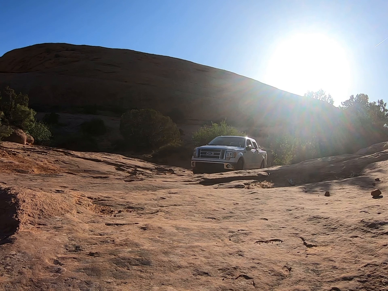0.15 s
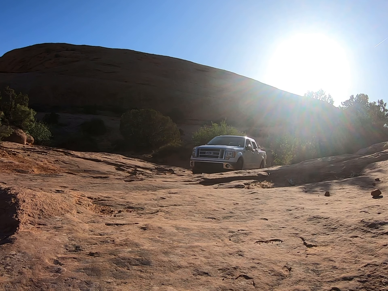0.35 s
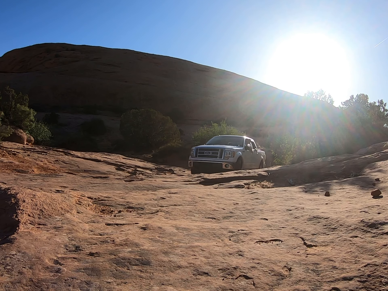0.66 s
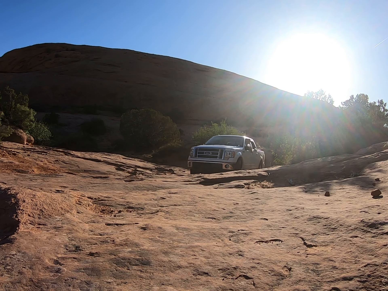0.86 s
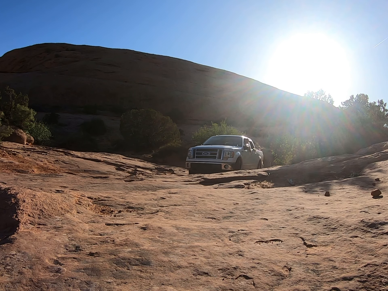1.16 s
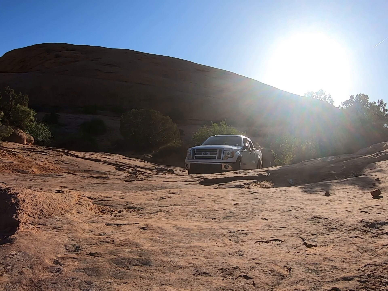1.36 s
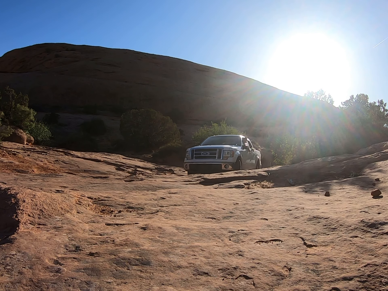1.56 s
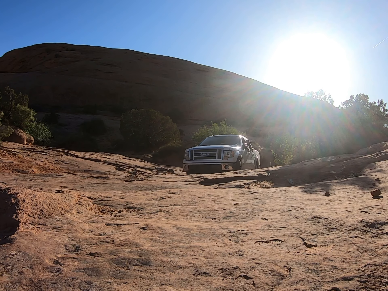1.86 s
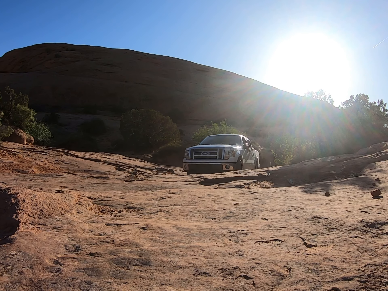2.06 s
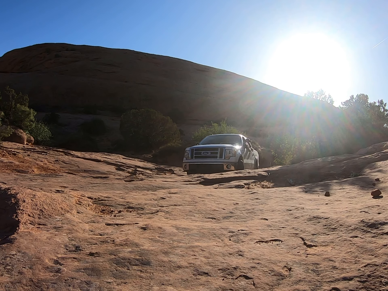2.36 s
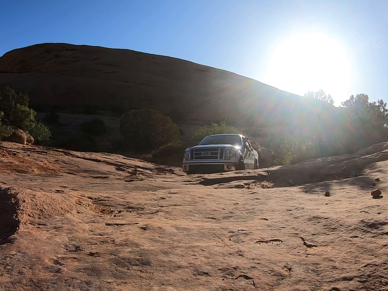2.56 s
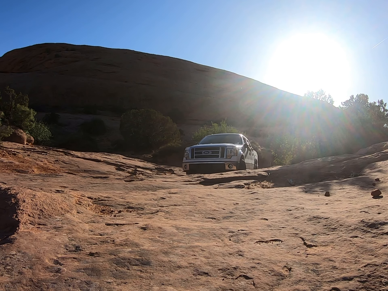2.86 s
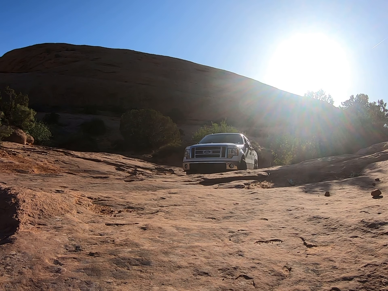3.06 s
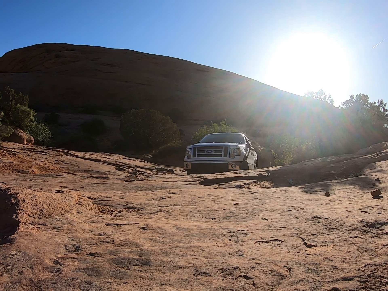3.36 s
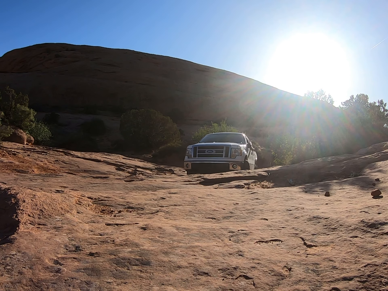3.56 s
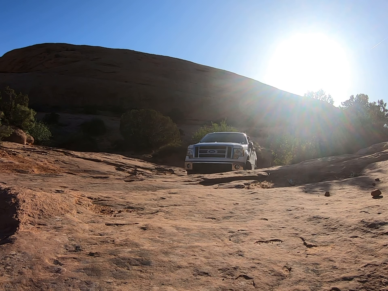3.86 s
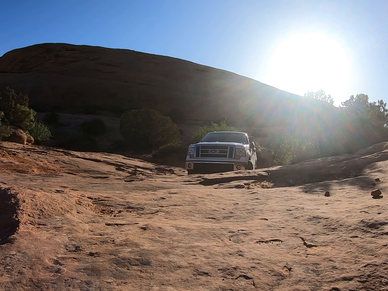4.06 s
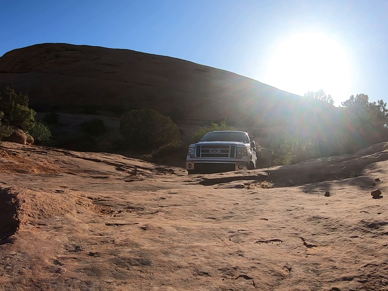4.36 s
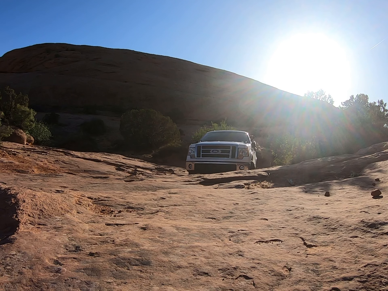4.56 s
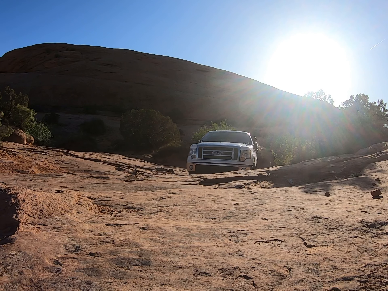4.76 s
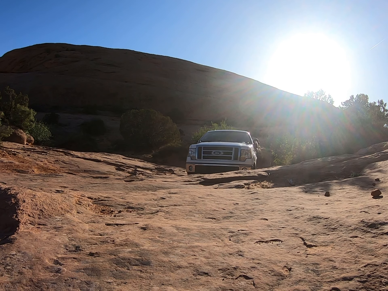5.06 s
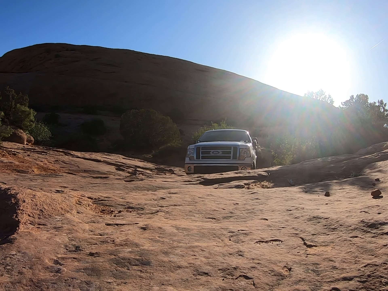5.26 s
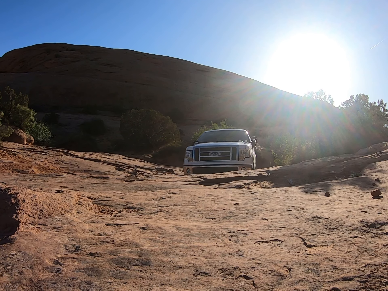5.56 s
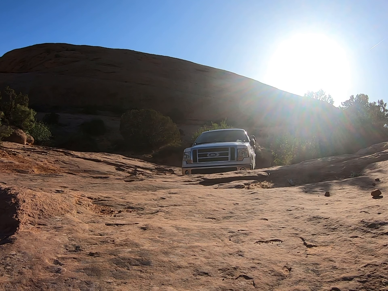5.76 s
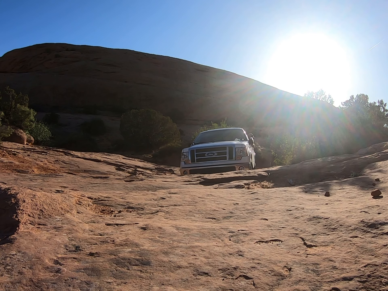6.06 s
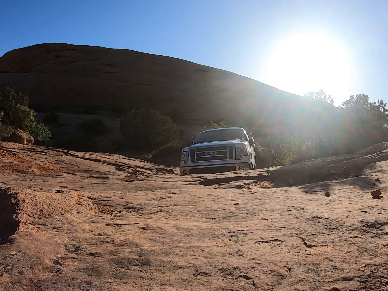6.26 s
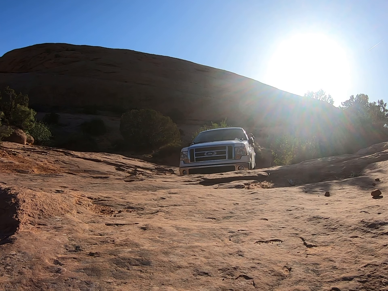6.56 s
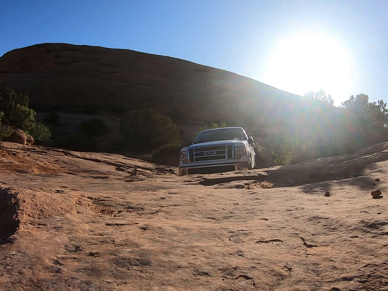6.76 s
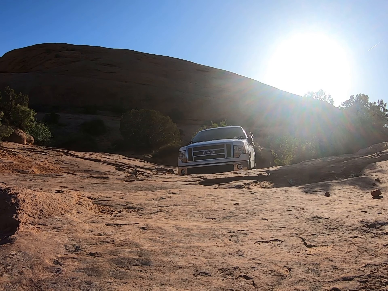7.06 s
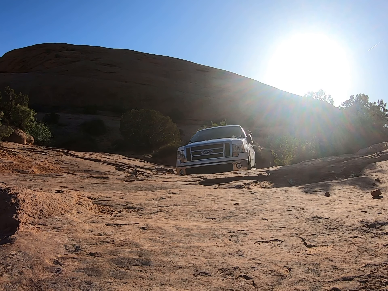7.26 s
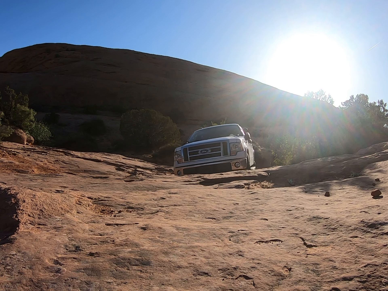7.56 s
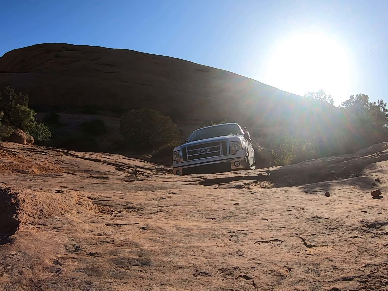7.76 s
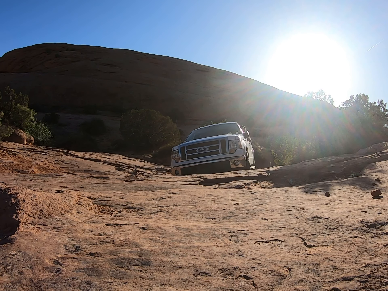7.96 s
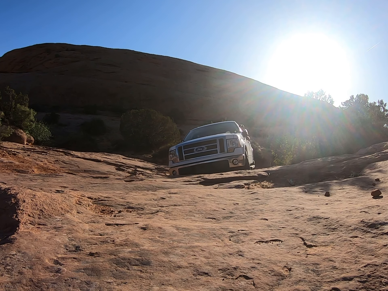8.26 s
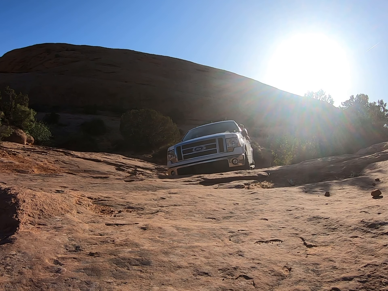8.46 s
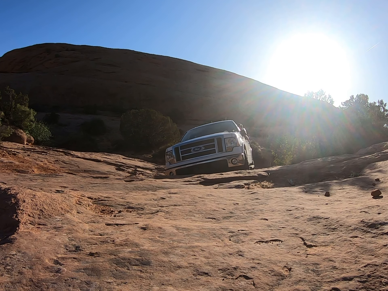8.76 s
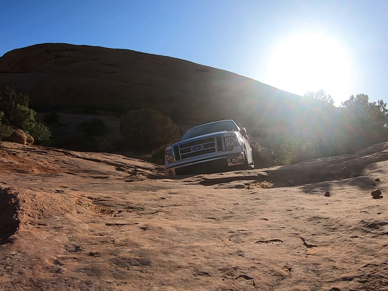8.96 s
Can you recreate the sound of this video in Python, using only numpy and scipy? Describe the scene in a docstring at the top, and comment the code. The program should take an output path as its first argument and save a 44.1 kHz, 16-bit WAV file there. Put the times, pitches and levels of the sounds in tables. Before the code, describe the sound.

A large V8 pickup crawls slowly toward a fixed outdoor microphone over bare rock. Its deep, uneven exhaust burble sits near idle, fades briefly around two seconds, then returns stronger, while a steady breathy fan rush gradually grows. A sharp stone knock snaps near five seconds, revs climb around seven, then drop, and a crunchy rattling knock comes near the end.

```python
"""A big V8 engine throbs unevenly near idle, under a breathy rush of fan and belts, as a pickup crawls closer.
The exhaust is one click per firing, sent through fixed resonances: both banks together throb and boom,
and the difference between the banks burbles. Engine speed and load rise and sag over bare rock.
Fan and belts are coloured noise and hum tones. Stones knock with short rings and rattles under the tyres,
and grit crunches in bursts of noise."""
import sys
import numpy as np
from scipy import signal
from scipy.fft import rfft, irfft, next_fast_len
from scipy.io import wavfile
from scipy.ndimage import map_coordinates

SR = 44100
rng = np.random.default_rng(int(sys.argv[2]) if len(sys.argv) > 2 else 0)


def wrap_up_sound(samples):
    """Save the sound to the file named by the first command line argument, as 16-bit audio."""
    columns = np.atleast_2d(samples).T
    # keep every value between -1 and 1, then stretch to whole-number steps
    tamed = np.clip(columns, -1, 1)
    steps = np.round(tamed * 32767).astype(np.int16)
    wavfile.write(sys.argv[1], SR, steps)


N = 402633  # length in samples


def amp(db):
    """Turn decibels into a gain."""
    return 10 ** (np.asarray(db) / 20)


def unit(x):
    """Scale to an rms of 1."""
    return x / np.sqrt(np.mean(x ** 2) + 1e-20)


def along(points, hz):
    """Read (Hz, value) points at any frequency, with straight lines on a log axis."""
    point_hz, value = np.transpose(points)
    return np.interp(np.log(hz + 1), np.log(point_hz + 1), value)


def curves(rows):
    """Draw one value per sample for each column after the time."""
    start_s, *columns = np.transpose(rows)
    time = np.arange(N) / SR
    return [np.interp(time, start_s, column) for column in columns]


def wobble(rate):
    """A smooth random curve through `rate` random points a second."""
    points = rng.standard_normal(int(N * rate / SR) + 4)
    return map_coordinates(points, [np.arange(N) * rate / SR])


def filtered(x, response):
    """Multiply the spectrum of x by a response that depends on frequency."""
    length = x.shape[-1]
    padded = next_fast_len(length + SR // 2)
    hz = np.fft.rfftfreq(padded, 1 / SR)
    return irfft(rfft(x, padded) * response(hz), padded)[..., :length]


def resonate(x, modes):
    """Ring x through resonances side by side; polarity says whether each one adds or subtracts."""
    def response(f):
        total = 0
        for centre, width, db, polarity in modes:
            peak = 1j * f * width / (centre * centre - f * f + 1j * f * width)
            total = total + np.sign(polarity) * amp(db) * peak
        return total
    return filtered(x, response)


def band(x, low_hz, high_hz):
    """Keep a band of pitches with steep sides."""
    sos = signal.butter(4, [low_hz, high_hz], "band", fs=SR, output="sos")
    return signal.sosfilt(sos, x)


def burst(t, t60, colour, attack=0.00018):
    """Coloured noise that rises over `attack` seconds and falls by 60 dB in t60 seconds."""
    noise = unit(filtered(rng.standard_normal(len(t)), colour))
    return noise * amp(-60 * t / t60) * (1 - np.exp(-t / attack)) / 2


# How alike left and right are: pitch_hz, likeness (1 = the same, 0 = unrelated, below 0 = opposed)
LIKENESS = [(100, 1), (300, 1), (600, 0.98), (1200, .97), (2500, 1), (4000, 0.99), (5500, 0.98),
            (7000, 0.57), (9000, -.25), (11000, .6)]


def air(spectrum):
    """Coloured stereo noise, nearly the same in both ears below the treble; its middle has an rms of 1."""
    def response(hz):
        turn = np.arccos(np.clip(along(LIKENESS, hz), -1, 1)) / 2
        side_gain = np.minimum(np.tan(turn), 2)
        return amp(along(spectrum, hz)) * np.array([np.ones_like(hz), side_gain])
    mid, side = filtered(rng.standard_normal((2, N)), response)
    return np.array([mid + side, mid - side]) / np.std(mid)


# Colour of the fan rush, far away and then near: pitch_hz, level_db (per Hz)
FAR_RUSH = [(170, -9), (290, -2.5), (317, -1.5), (355, -8.5), (384, -5), (440, -5.5), (536, -8.5),
            (580, -7.5), (734, -6.5), (849, -14.5), (1280, -13), (1400, -16.5), (2840, -17.5), (4200, -28),
            (5460, -40), (9240, -120)]
NEAR_RUSH = [(170, -30.5), (290, -2), (351, -6), (384, -5.5), (491, -4.5), (570, -7), (607, -4),
             (750, -6.5), (820, -9.5), (900, -14), (1440, -14.5), (1750, -13.5), (1900, -18), (1990, -19),
             (2080, -13.5), (2170, -17), (3280, -20.5), (4200, -29.5), (5460, -64.5), (9240, -120)]


def fan_rush(beat, pulsing=0.025, flutter_db=0.51):
    """Moving air: noise pulsing with the firings, its colour changing from far to near."""
    change_start_s, change_s = 2.5, 2.66
    near = np.clip((np.arange(N) / SR - change_start_s) / change_s, 0, 1)
    rush = np.sqrt(1 - near) * air(FAR_RUSH) + np.sqrt(near) * air(NEAR_RUSH)
    return rush * (1 + pulsing * beat) * amp(flutter_db * wobble(14))


# Hum tones, as of a cooling fan: pitch_hz, level_db (middle level, compared with the rush)
FAN_TONES = [(250.5, -9.5), (267, -12), (311.5, -16), (376, -16), (426.5, -18.5)]


def fan_hum():
    """Sine tones whose shared pitch drifts slightly and whose levels waver separately."""
    fan_time = np.cumsum(1 + 0.0038 * wobble(4)) / SR
    hum = 0
    for hz, db in FAN_TONES:
        level = amp(db + 1.8 * wobble(3.3)) * np.sqrt(2)
        hum = hum + level * np.sin(2 * np.pi * hz * fan_time)
    return hum


# Colour of the belt hiss: pitch_hz, level_db (per Hz)
BELT_HISS = [(2600, -43), (3900, -13), (4500, -3), (5100, -7.5), (6000, -10), (6700, -9), (7800, -12.5),
             (8500, -23), (9400, -27.5), (10200, -24), (11000, -46.5), (13000, -68.5)]


def belt_hiss(beat, pulsing=0.051):
    """Bright noise that pulses with the firings."""
    return air(BELT_HISS) * (1 + pulsing * beat)


def nearness_db(distance):
    """Sound spreads out as it travels: the gain since the start of the approach."""
    return 20 * np.log10(distance[0] / distance)


# Colour of the low rumble: pitch_hz, level_db (per Hz)
LOW_RUMBLE = [(15, -14), (28, -6), (45, -3), (75, -1), (100, -1), (135, 2), (165, 4), (240, -3), (330, -22),
              (500, -60)]
# Levels at idle and the starting distance (dB), and growth per doubling of engine speed (dB)
RUSH_DB, RUSH_DB_PER_OCTAVE = -48.5, 0.1
HISS_DB, HISS_DB_PER_OCTAVE = -75, 2
HISS_LOSS_DB_PER_M = 0.41  # treble lost along the ground, on top of spreading


def engine_bay(firings, revs, distance):
    """Fan, rumble and belts under the bonnet grow with engine speed and as the truck nears."""
    closer_db = nearness_db(distance)
    rush_db = RUSH_DB + RUSH_DB_PER_OCTAVE * revs + closer_db
    hiss_db = HISS_DB + HISS_DB_PER_OCTAVE * revs + closer_db
    hiss_db = hiss_db + HISS_LOSS_DB_PER_M * (distance[0] - distance)
    beat = np.cos(2 * np.pi * firings)  # one swing per firing
    low_and_middle = fan_rush(beat) + fan_hum() + air(LOW_RUMBLE)
    return amp(rush_db) * low_and_middle + amp(hiss_db) * belt_hiss(beat)


def knock(t, hz, ring_cycles, rattle_db, t60, reach=2.5, width=0.98):
    """A stone snaps against the rock: a dying ring, with a noisy rattle around the same pitch."""
    ring = np.sin(2 * np.pi * hz * t) * amp(-60 * t * hz / ring_cycles)
    rattle = burst(t, t60, lambda f: f * hz / (hz * hz - f * f + 1j * width * f * hz))
    # the rubber on the stone mutes what lies far from its pitch
    return band(ring + amp(rattle_db) * rattle, hz / 1.73, min(reach * hz, 6000))


# Stones and ledges knocking under the tyres: start_s, level_db, pitch_hz,
# ring_cycles (cycles to fall by 60 dB), rattle_db (against the ring), rattle_t60_s (time to fall by 60 dB)
STONE_KNOCKS = [(.943, -35.5, 480, 5, -2, 0.1), (0.945, -39, 1290, 4, -2, 0.08),
                (1.92, -38, 2030, 25, -8, 0.062), (4.143, -29.5, 810, 5.9, -17, .036),
                (4.9061, -19, 1110, 1.8, -13, 0.028), (4.935, -31, 1310, 3.9, -7, .02),
                (5.8294, -34, 815, 24, -11, .06), (5.83, -29, 1200, 4, -13, .025),
                (7.72, -34.5, 292, 55, -16, 0.16), (8.6, -36, 88, 25, -16, .1),
                (8.623, -35.5, 564, 8.2, 3.5, 0.29), (8.632, -30, 794, 4, -1, 0.12),
                (8.6369, -30, 2100, 1.9, -6, 0.067), (8.64, -28, 1400, 2.8, -7, .04)]
# Grit crushed on the rock: start_s, level_db, t60_s (time to fall by 60 dB), dull_above_hz
GRIT_CRUNCHES = [(0.941, -39.5, 0.096, 11900), (7.760, -48, 0.11, 12000), (8.635, -33.5, 0.053, 5500)]
# Colour of crushed grit: pitch_hz, level_db (per Hz)
GRIT_COLOUR = [(500, -20), (1500, 8), (3000, 10.5), (4500, 4.5), (7000, -2), (9000, -13), (13000, -19),
               (14500, -60)]


def tyres(grit_rise_s=0.0025):
    """Loose stones knock, and grit breaks in bright bursts of noise under the tread."""
    out = np.zeros(N + SR)
    t = np.arange(SR // 4) / SR
    for start_s, db, hz, cycles, rattle_db, t60 in STONE_KNOCKS:
        place = out[round(start_s * SR):][:len(t)]
        place += amp(db) * knock(t, hz, cycles, rattle_db, t60)
    for start_s, db, t60, dull_hz in GRIT_CRUNCHES:
        colour = lambda f: amp(along(GRIT_COLOUR, f)) / (1 + (f / dull_hz) ** 4)
        place = out[round(start_s * SR):][:len(t)]
        place += amp(db) * burst(t, t60, colour, grit_rise_s)
    return out[:N]


# The puffs in firing order, strong from the bank with the short pipe, weak from the other:
# strength_db, bank (+1 or -1)
FIRING_ORDER = [(5.3, 1), (4.7, 1), (-2.6, -1), (2.6, 1), (-5.4, -1), (-3.2, -1), (4.7, 1), (-5.5, -1)]


def puffs(firings, scatter_db=0.3, jitter_s=0.00003):
    """One click per firing, slightly uneven in time and strength: the banks' sum and their difference."""
    # begin a second early, so the resonances are already ringing at the start
    early = firings[0] + (firings[1] - firings[0]) * np.arange(-SR, 0)
    firings = np.concatenate([early, firings])
    at = np.flatnonzero(np.diff(np.floor(firings))) + 1
    cylinder = np.floor(firings[at]).astype(int) % len(FIRING_ORDER)
    db, bank = np.array(FIRING_ORDER)[cylinder].T
    chance = rng.standard_normal((len(at), 2))
    at = np.clip(at + SR * jitter_s * chance[:, 0], 0, N + SR - 1).astype(int)
    size = amp(db + scatter_db * chance[:, 1])
    together = np.bincount(at, size, N + SR)
    opposed = np.bincount(at, size * bank, N + SR)
    return together, opposed


# Resonances of the long pipe, of the muffler, and of the burble driven by the imbalance between the banks:
# pitch_hz, width_hz, level_db, polarity (+1 or -1)
PIPE_MODES = [(46.0, 6.6, 20.1, 1.0), (68.4, 8.4, 17.8, -1.0), (89.7, 3.4, 18.8, 1.0)]
MUFFLER_MODES = [(129.1, 25.4, 18, -1), (129.1, 6.7, 27.7, 1), (175.8, 2.2, 13, 1), (197.1, 3.1, 6.8, -1),
                 (227.2, 10.2, 6.3, -1)]
BURBLE_MODES = [(45.8, 7.9, 17.7, -1.0), (67.6, 20.4, 18.8, 1.0), (74.9, 8.5, 22.3, -1.0),
                (127.3, 3.9, 26.8, -1.0), (134.0, 4.7, 18.3, 1.0), (178.6, 5.8, 16.8, 1.0),
                (195.8, 9.4, 14.9, -1.0), (205.9, 9.4, 13.4, 1.0), (232.7, 3.9, 4.6, -1.0),
                (266.9, 4.4, 9.8, -1.0)]
# Load on the engine, rising at each ledge and falling as the truck rolls off it:
# start_s, pipe_throb_db, muffler_boom_db, burble_db
ENGINE_LOAD = [(0.0, -7, -16, -6.5), (0.35, -8, -7.16, -6.5), (0.62, 0.5, -3.5, -1.2),
               (0.8, -5.5, -7, -6.37), (1.08, 2.2, -7.5, -0.86), (1.5, 3.8, -3.5, 1.32),
               (1.95, 1.11, -2.17, -2.86), (2.12, -15.9, -24.5, -11), (2.55, -19, -13.74, -8.5),
               (2.72, -13, -12, -1.5), (3.0, 2, 2.5, -2), (3.15, 3.5, 5, -0.5), (3.5, 2.94, -8.5, 3),
               (3.85, 3, 5, 3.5), (4.35, 3, 7.5, 2), (4.8, -4.5, -6.5, 1.1), (5.05, 0, 0.2, -3.44),
               (5.4, 1.46, 3.5, -1.5), (6.05, 4.5, 6, 4.0), (6.4, 8, 9, 3.5), (6.72, 6.5, 8, 7.63),
               (7.15, 7.5, 11.5, 7), (7.48, -0.28, 3, 1.14), (7.65, 7.5, 9, 5), (8.25, 6.5, 7, 3.5),
               (8.6, -1, 9, 2.5), (8.8, 4, 4.5, 2.5), (9.13, 7.25, 7, 6)]
PIPE_DB, MUFFLER_DB, BURBLE_DB = 0.8, 0.86, 0.65  # gain on top of the load


def exhaust(firings):
    """Engine tones swell as they sweep across the exhaust's fixed resonances; load sets each layer's drive."""
    together, opposed = puffs(firings)
    throb_load, boom_load, burble_load = curves(ENGINE_LOAD)

    def layer(train, modes, load_db, db):
        drive_db = db + np.pad(load_db, (SR, 0), "edge")
        return resonate(train * amp(drive_db), modes)

    throb = layer(together, PIPE_MODES, throb_load, PIPE_DB)
    boom = layer(together, MUFFLER_MODES, boom_load, MUFFLER_DB)
    burble = layer(opposed, BURBLE_MODES, burble_load, BURBLE_DB)
    return band(throb + boom + burble, 36, 300)[SR:]  # drop the early second


# Engine speed: start_s, speed_rpm (crank turns a minute)
ENGINE_SPEED = [(0.0, 714.76), (0.39, 711.53), (0.56, 656.38), (0.75, 659.7), (0.95, 673.38),
                (1.46, 682.93), (2.0, 645.95), (2.2, 672.07), (2.45, 638.7), (2.75, 633.38), (3.04, 620.53),
                (3.29, 661.21), (3.75, 743.33), (4.24, 799.05), (4.5, 757.33), (4.75, 712.35),
                (5.13, 634.55), (5.48, 699.01), (5.79, 690.98), (6.15, 746.63), (6.5, 939.83),
                (6.59, 975.77), (6.88, 1067.57), (7.05, 1070.25), (7.27, 1081.57), (7.52, 828.86),
                (8.0, 852.63), (8.26, 914.94), (8.5, 812.15), (8.72, 705.67), (8.9, 729.72), (9.13, 705.51)]
# The slow approach: start_s, distance_m
TRUCK_APPROACH = [(0, 19.5), (5.8, 12.66), (9.13, 11.3)]
IDLE_RPM = 700
CRANK_START = 7.652  # place in the firing order at time zero (firings)


def scene():
    """The truck, almost straight ahead: engine speed and distance drive its layers."""
    rpm, = curves(ENGINE_SPEED)
    distance, = curves(TRUCK_APPROACH)
    firings = CRANK_START + np.cumsum(rpm / 60 * 4) / SR  # four firings a turn
    revs = np.log2(rpm / IDLE_RPM)  # octaves above idle
    bay = engine_bay(firings, revs, distance) * amp([[-0.2], [0.2]])  # left and right, dB
    ground_and_exhaust = (tyres() + exhaust(firings)) * amp([[-0.05], [0.05]])
    return bay + ground_and_exhaust


# Bass roll-off of the left and right microphone: pitch_hz
BASS_CUT_HZ = [9.9, 7.2]
TOP_HZ = 13000


def record(dry):
    """The two microphones lose the lowest bass slightly differently; nothing passes above the top limit."""
    def bass_cut(f):
        return np.array([1j * f / (1j * f + hz) for hz in BASS_CUT_HZ])
    return filtered(filtered(dry, bass_cut), lambda hz: hz < TOP_HZ)


dry = scene()
out = record(dry)
wrap_up_sound(out)
```